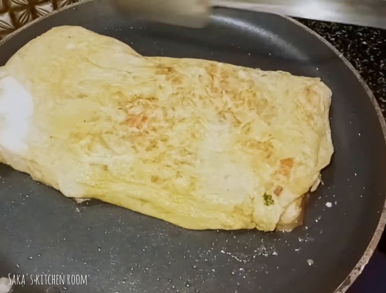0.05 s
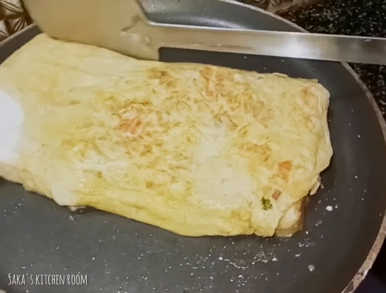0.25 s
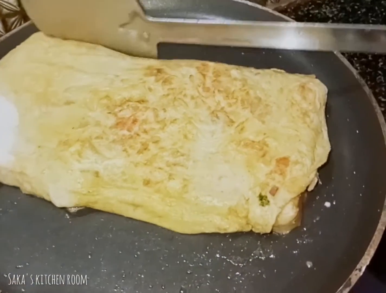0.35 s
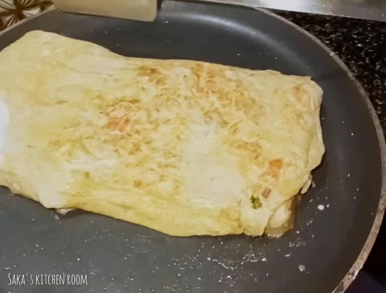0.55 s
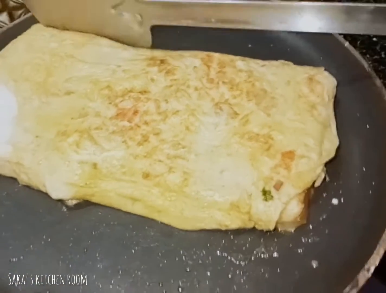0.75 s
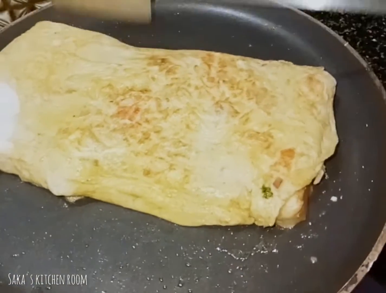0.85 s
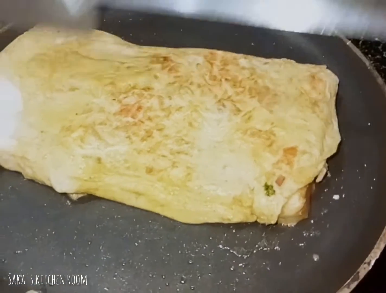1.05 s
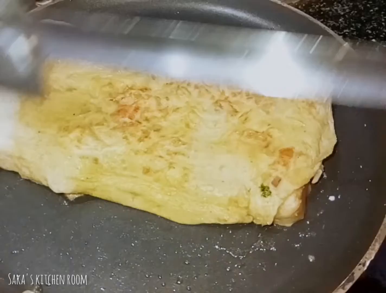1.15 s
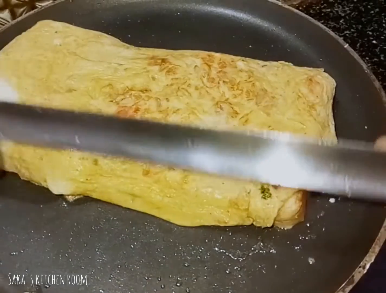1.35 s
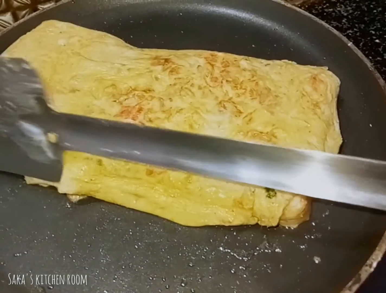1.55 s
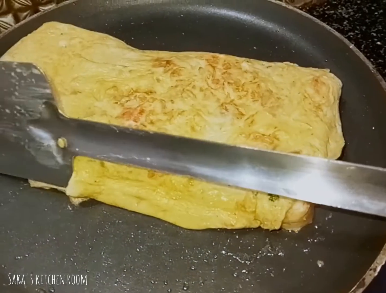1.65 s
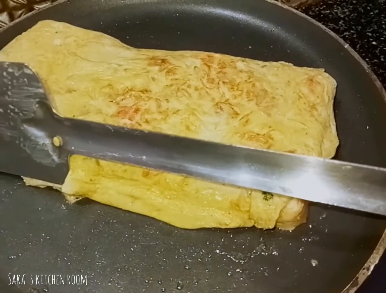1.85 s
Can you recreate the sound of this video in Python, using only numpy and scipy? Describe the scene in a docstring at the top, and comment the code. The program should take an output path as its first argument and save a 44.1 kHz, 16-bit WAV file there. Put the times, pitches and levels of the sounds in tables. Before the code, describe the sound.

A steel spatula knocks once on a frying pan close by and scrapes briefly, then knocks twice more a second later, each hit ringing a little. Oil sizzles and spits faintly under an omelette in a small kitchen.

```python
"""In a small kitchen, a little oil sizzles and spits faintly under an omelette, over a low rumble.
Almost at once a steel spatula knocks on the nonstick frying pan close by, then scrapes it briefly.
The oil goes on alone for about a second, until two more knocks come in quick succession.
Each knock is a crack, a short dense clatter and the ring of pan and blade; the room answers."""
import sys
import numpy as np
from scipy import signal
from scipy.fft import rfft, irfft, next_fast_len
from scipy.io import wavfile

SR = 44100
rng = np.random.default_rng(int(sys.argv[2]) if len(sys.argv) > 2 else 0)


def generate_wav(signal):
    """Clip the signal to [-1, 1] and save it as 16-bit WAV at the path in sys.argv[1]."""
    frames = np.transpose(np.atleast_2d(signal))
    scaled = np.clip(frames, -1, 1) * 32767
    pcm = np.round(scaled).astype(np.int16)
    wavfile.write(sys.argv[1], SR, pcm)


N = 83790


def amp(db):
    """Turns decibels into a number to multiply by."""
    return 10 ** (np.asarray(db) / 20)


def unit(x):
    """Scales a sound to an average strength (rms) of 1."""
    return x / np.sqrt(np.mean(x ** 2) + 1e-20)


def along(points, hz):
    """Reads between the rows of a (pitch_hz, value) table, on a log pitch scale."""
    pitches, values = np.transpose(points)
    return np.interp(np.log(hz + 1), np.log(pitches + 1), values)


def noise(colour):
    """Steady noise, rms 1. A colour is a table of how strong each pitch is."""
    size = next_fast_len(N + SR // 2)
    gain = amp(along(colour, np.fft.rfftfreq(size, 1 / SR)))
    return unit(irfft(rfft(rng.standard_normal(N), size) * gain, size)[:N])


def click(colour, size=4096):
    """The sharpest click that has this colour, peak 1."""
    cepstrum = irfft(np.log(amp(along(colour, np.fft.rfftfreq(size, 1 / SR)))))
    # pack the energy at the very start (minimum phase)
    cepstrum[1:size // 2] *= 2
    cepstrum[size // 2 + 1:] = 0
    pulse = irfft(np.exp(rfft(cepstrum)))
    return pulse / np.abs(pulse).max()


def dying(x, fade_s):
    """Fades each pitch at its own speed. A fade time is how long it takes to drop 60 dB."""
    hz, t, spectrum = signal.stft(x, SR, nperseg=256)
    fade = amp(-60 * t / np.abs(fade_s(hz))[:, None])
    return signal.istft(spectrum * fade, SR, nperseg=256)[1][:N]


def add(track, start_s, sound):
    """Mixes a sound into the track."""
    part = track[max(round(start_s * SR), 0):][:len(sound)]
    part += sound[:len(part)]


# Colour of the kitchen's background: pitch_hz, level_db
RUMBLE_COLOUR = [(20, -31.5), (45, -19), (70, -2.5), (105, -3), (170, -6.5), (300, -10), (800, -13.5),
                 (2500, -21), (8000, -61)]

def rumble(level_db=-68):
    """The kitchen's faint, low, steady background."""
    return amp(level_db) * noise(RUMBLE_COLOUR)


# How long the room holds each pitch: pitch_hz, fade_s
ROOM_FADES = [(100, 0.42), (400, 0.63), (1200, 0.52), (2600, 0.62), (6000, 0.36), (13000, 0.9)]

def room_echo(x, build_s=0.016):
    """The room answers a sound with a smooth wash of echoes, about as strong as the sound."""
    swell = 1 - np.exp(-np.arange(N) / SR / build_s)
    tail = swell * dying(rng.standard_normal(N), lambda hz: along(ROOM_FADES, hz))
    return signal.fftconvolve(x, tail / np.linalg.norm(tail))[:N]


def crackle(colour, per_s, spread_db=8.5):
    """Tiny bursts of random size at random moments, rms 1."""
    sizes = amp(spread_db * np.minimum(rng.standard_normal(N), 2)) * rng.choice([-1, 1], N)
    happens = rng.random(N) < per_s / SR
    return unit(signal.fftconvolve(sizes * happens, click(colour))[:N])


# How the sizzle rises and falls: time_s, level_db
SIZZLE_LEVELS = [(0, -54), (.12, -53.5), (.19, -51), (.215, -58), (.5, -58), (.72, -59), (.97, -57),
                 (1.075, -60.5), (1.094, -54.5), (1.28, -53.5), (1.34, -57), (1.41, -54.5), (1.7, -55),
                 (1.83, -56), (1.9, -57)]
# Colours of the sizzle and of the finest droplets' snaps: pitch_hz, level_db
SIZZLE_COLOUR = [(150, -27), (500, -19), (1700, -10.5), (2400, -12.5), (3700, -7), (4450, 0), (5400, -5),
                 (6200, -13), (7400, -17.5), (9000, -15), (12000, -23), (15000, -26)]
SNAP_COLOUR = [(1000, -33), (4000, -13), (6500, -11), (8600, -2.5), (11000, -7.5), (12500, -17),
               (15000, -8.5)]

def sizzle():
    """Countless bursts in the oil: the larger crackle, the finest snap, the rest blur into a hiss."""
    strength = amp(np.interp(np.arange(N) / SR, *np.transpose(SIZZLE_LEVELS)))
    crackles = amp(-4) * crackle(SIZZLE_COLOUR, per_s=800)
    snaps = amp(-17) * crackle(SNAP_COLOUR, per_s=70)
    hiss = amp(-1.5) * noise(SIZZLE_COLOUR)
    return strength * (crackles + snaps + hiss)


# The louder spits of oil: start_s, peak_db (before gain_db is added)
SPITS = [(0.0094, -34), (0.0248, -37), (0.0573, -37.5), (0.11, -39), (0.154, -28), (0.187, -36),
         (0.4791, -32.5), (0.5362, -36.5), (0.6827, -41), (0.761, -39.5), (0.8644, -42), (0.9554, -34),
         (1.0882, -42.5), (1.171, -36), (1.2115, -35.5), (1.2307, -37), (1.2491, -37), (1.265, -32.5),
         (1.287, -36.5), (1.369, -29), (1.812, -37)]
# Colour of a spit: pitch_hz, level_db
SPIT_COLOUR = [(200, -43), (700, -26.5), (1600, -17), (3000, -18.5), (4000, -6.5), (4500, 10.5),
               (5400, -3.5), (6500, -18.5), (9000, -10.5), (12000, -31), (15000, -23)]

def spits(burst_s=0.00023, lag_s=0.001, gain_db=-2.5, room_db=-11.5):
    """Single drops of water burst in the oil, each a tiny puff."""
    out = np.zeros(N)
    pulse = click(SPIT_COLOUR)
    t = np.arange(len(pulse)) / SR
    for start_s, peak_db in SPITS:
        puff = rng.standard_normal(len(t)) * np.exp(-t / burst_s)
        pop = signal.fftconvolve(puff, pulse)
        add(out, start_s + lag_s, amp(peak_db + gain_db) * pop / np.abs(pop).max())
    return out + amp(room_db) * room_echo(out)


def scrape(colour, middle_s=0.39, half_length_s=0.026, level_db=-41, room_db=-8.5):
    """The blade drags softly over the pan for a moment."""
    swell = np.exp(-((np.arange(N) / SR - middle_s) / half_length_s) ** 2)
    rub = amp(level_db) * swell * noise(colour)
    return rub + amp(room_db) * room_echo(rub)


def crack(colour, bounces=8, latest_s=0.03, bounce_db=-5.5):
    """The click of contact bounces off stove top, tiles and cupboards; later bounces are weaker."""
    paths = np.zeros(SR // 10)
    paths[0] = 1  # the direct sound
    for k, lateness in enumerate(rng.random(bounces)):
        add(paths, lateness * latest_s, (-1) ** k * amp([bounce_db]) / (1 + lateness))
    return signal.fftconvolve(click(colour), paths)


# How much longer or shorter each pitch of the clatter lasts: pitch_hz, fade_factor
CLATTER_FADES = [(100, 2.7), (600, 0.62), (2500, 1.22), (6000, 0.84), (13000, 0.67)]

def clatter(colour, fade_s, average_gap_hz=12, attack_s=0.000269):
    """A knock stirs a crowd of weak tones at random pitches, which die away quickly."""
    pitches = np.fft.rfftfreq(N, 1 / SR)
    chosen = rng.random(len(pitches)) < pitches[1] / average_gap_hz
    phases = np.exp(2j * np.pi * rng.random(len(pitches)))
    tones = unit(irfft(chosen * phases * amp(along(colour, pitches)), N))
    rise = 1 - np.exp(-np.arange(N) / SR / attack_s)
    return rise * dying(tones, lambda hz: fade_s * along(CLATTER_FADES, hz))


# The strong tones of pan and blade, with their level in each knock (before gain_db is added):
# pitch_hz: (fade_s, first_db, second_db, third_db)
PAN_TONES = { 317: (0.61, -39.5, -32.5, -32), 382: (0.53, -41.5, -36, -36.5),
             600: (0.2051, -26.5, -33.5, -32.5), 696: (0.1954, -41, -34, -29.5),
             922: (0.2326, -32, -31, -26), 958: (0.4062, -41, -37, -28.5), 1292: (0.23, -36, -43, -27),
             1382: (0.1549, -17.5, -26, -22.5), 1452: (0.2323, -24.5, -37, -42),
             1575: (0.29, -47.5, -27, -24.5), 1667: (0.14, -40, -35, -22), 1724: (0.22, -34, -38, -28.5),
             1872: (0.26, -32, -48, -44), 2100: (0.25, -30.5, -44, -52), 2229: (.5, -34, -36, -26),
             2309: (.33, -36.5, -33, -25.5), 2530: (0.2446, -26.5, -35, -34.5),
             2647: (0.44, -28.5, -53, -36), 2721: (0.3041, -26.5, -47, -51),
             2907: (0.61, -37.5, -30.5, -27), 2986: (0.2063, -29, -43, -26.5),
             3269: (0.2437, -25.5, -45, -51), 3634: (0.43, -35, -34, -28), 3721: (0.18, -27, -34, -39),
             4155: (0.25, -37.5, -25, -39), 4290: (0.35, -43, -37, -31), 4938: (0.28, -30.5, -41, -48),
             5146: (0.38, -43.5, -32.5, -46), 5350: (0.26, -37, -47, -44), 5900: (0.15, -30, -34, -54),
             5993: (0.23, -35, -28, -61), 6799: (0.32, -45, -35.5, -51), 7200: (0.18, -34.5, -58, -63.5),
             8680: (0.18, -42, -59, -69), 9200: (0.1, -42, -54, -60), 9590: (0.06, -40, -63, -55)}

def ring(knock, next_knock_s, gain_db=-1.5, twin_db=-7, twin_within_hz=22.05, stifle_fade_s=0.1):
    """Pan and blade ring after a knock, until the next contact stifles them."""
    t = np.arange(N // 2) / SR
    hz = np.array(list(PAN_TONES))[:, None]
    fade_s, *levels_db = np.transpose(list(PAN_TONES.values()))[:, :, None]
    phase, twin_phase, split = rng.random((len(hz), 3)).T[:, :, None]
    # each tone has a quieter twin close in pitch, so the pair wavers
    twin_hz = hz + twin_within_hz * (2 * split - 1)
    tones = np.sin(2 * np.pi * (hz * t + phase))
    twins = amp(twin_db) * np.sin(2 * np.pi * (twin_hz * t + twin_phase))
    strength = amp(levels_db[knock] + gain_db - 60 * t / fade_s)
    stifle = amp(-60 * np.maximum(t - next_knock_s, 0) / stifle_fade_s)
    return np.pad(stifle * np.sum(strength * (tones + twins), axis=0), (0, N - len(t)))


# The knocks: start_s, level_db (of clatter and crack), extra_crack_db, clatter_fade_s, room_db
KNOCKS = [(0.2260, -15, 2, 0.17, -8.5), (1.4332, -21, -2.5, 0.19, -10), (1.5247, -17.5, 1.5, 0.24, -10)]
# One colour for each knock, set by where the blade lands: pitch_hz, level_db
KNOCK_COLOURS = [
    [(40, -44.5), (100, -28), (200, -19), (340, -9.5), (480, -17.5), (620, -5.5), (800, -6.5), (1130, -9.5),
     (1450, -4), (2000, -4.5), (2700, -3), (3800, -6), (4300, -9), (5200, -13.5), (7300, -19.5),
     (8200, -29.5), (9600, -31), (11500, -39), (15000, -57)],
    [(40, -57), (100, -16), (200, -9), (400, 2), (800, 2.5), (1400, 0), (2000, -4.5), (2900, -2),
     (3300, -12), (3900, -5.5), (4700, -2), (5900, -14.5), (7500, -16), (9000, -21.5), (10800, -27),
     (12500, -34.5), (15000, -40)],
    [(40, -52), (100, -40), (190, -12.5), (400, -4.5), (800, 0.5), (1080, -6), (1600, -1.5), (2000, -4.5),
     (2900, -6.5), (4300, -9), (4900, -22), (6100, -24), (6700, -21), (7400, -28), (9500, -35),
     (11000, -52), (15000, -68)],
]

def spatula(crack_db=13, ring_room_db=-16.5):
    """Steel hits the pan: each knock cracks, clatters and leaves the strong tones ringing."""
    out = np.zeros(N)
    gaps_s = np.diff([row[0] for row in KNOCKS] + [np.inf])
    for knock, (start_s, level_db, extra_crack_db, fade_s, room_db) in enumerate(KNOCKS):
        colour = KNOCK_COLOURS[knock]
        hit = clatter(colour, fade_s)
        add(hit, 0, amp(crack_db + extra_crack_db) * crack(colour))
        hit *= amp(level_db)
        rise = 1 - np.exp(-np.arange(N) / SR / 0.000269)  # the ring starts almost at once
        ringing = rise * ring(knock, gaps_s[knock])
        echo = room_echo(amp(room_db) * hit + amp(ring_room_db) * ringing)
        add(out, start_s, hit + ringing + echo)
    return out


def scene():
    """Spatula, oil and the room's background at one microphone."""
    return (spatula() + scrape(KNOCK_COLOURS[0]) + spits() + sizzle() + rumble())[None]


def record(dry):
    """Thins the deep bass, rounds off the highest peaks and cuts the very top of the treble."""
    bass_cut = signal.butter(2, 55, "high", fs=SR, output="sos")
    treble_cut = signal.ellip(10, .1, 80, 15600, fs=SR, output="sos")
    thinned = signal.sosfilt(bass_cut, dry[0])
    rounded = thinned / (1 + np.abs(thinned) ** 10) ** (1 / 10)
    return signal.sosfilt(treble_cut, rounded)[None]


dry = scene()
out = record(dry)
generate_wav(out)
```